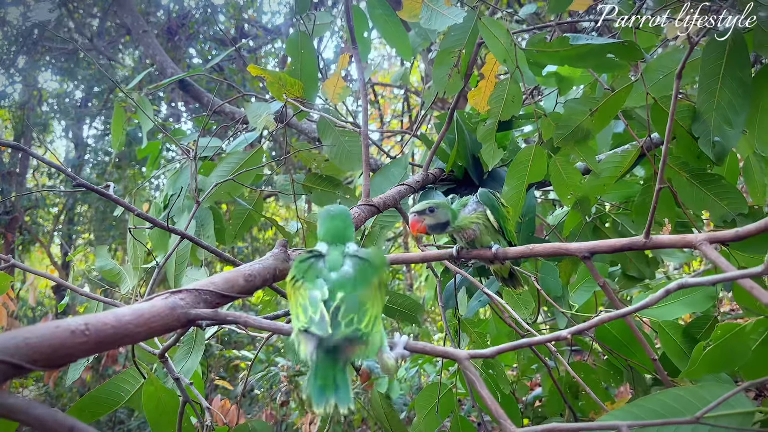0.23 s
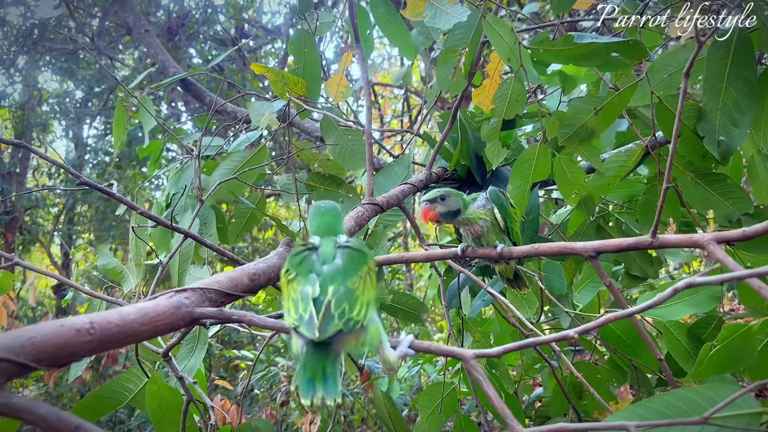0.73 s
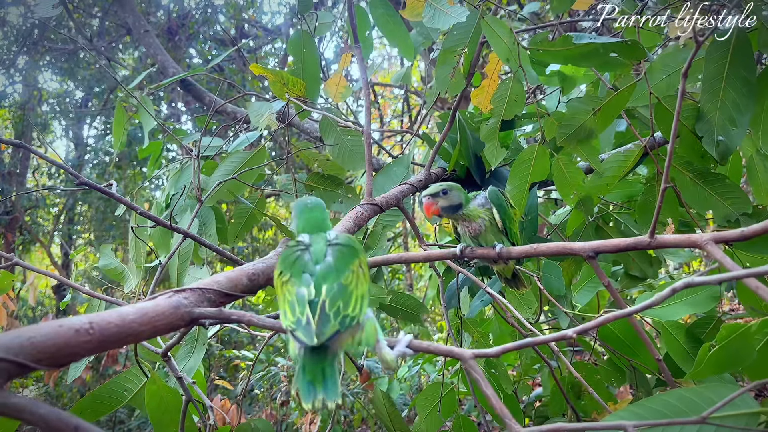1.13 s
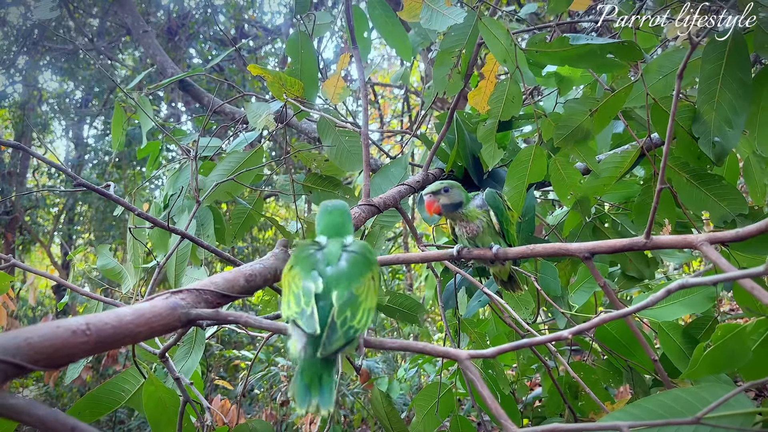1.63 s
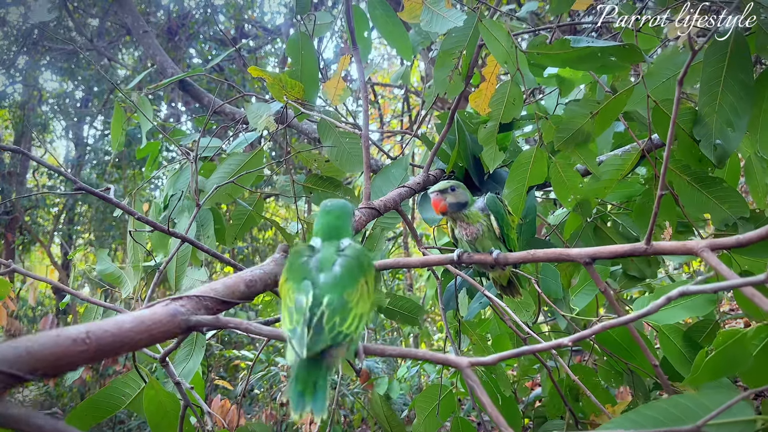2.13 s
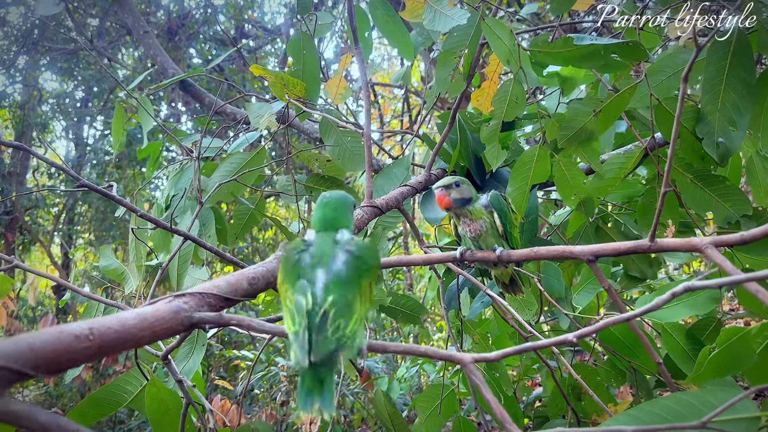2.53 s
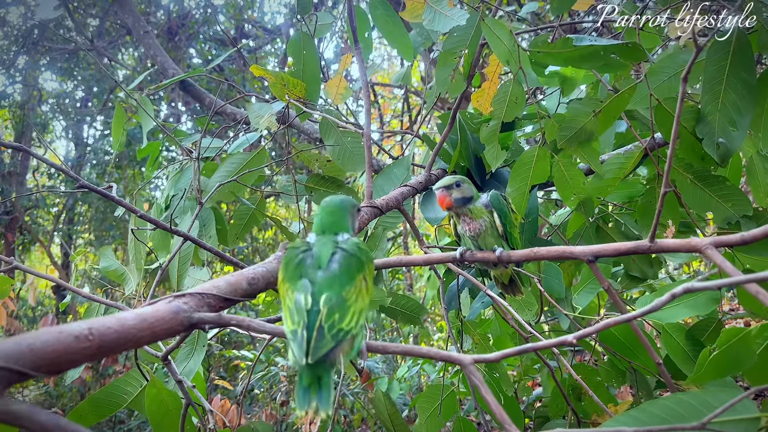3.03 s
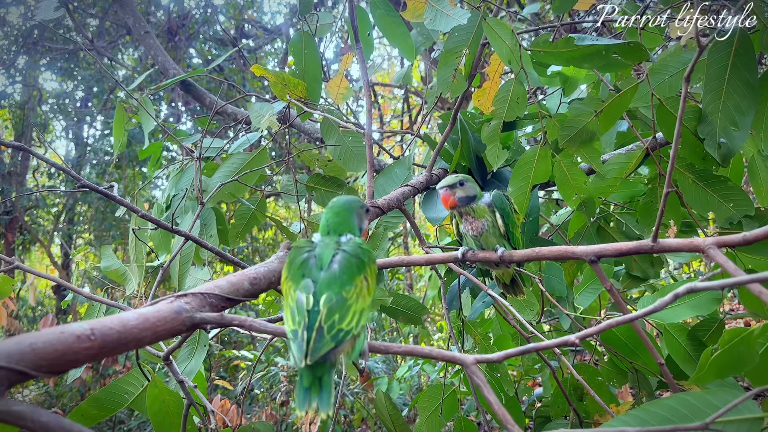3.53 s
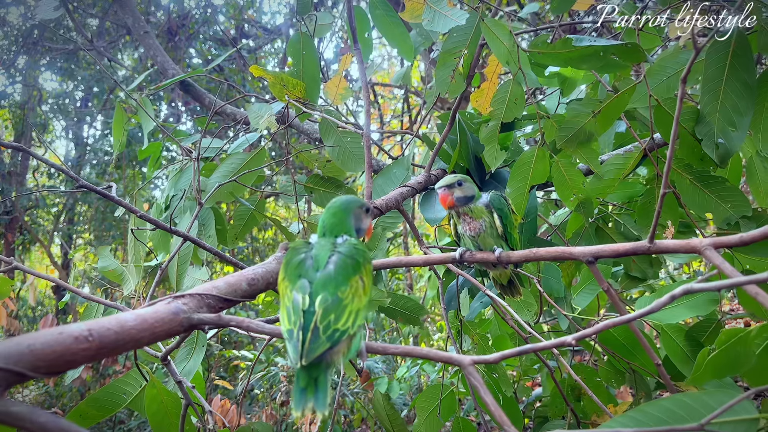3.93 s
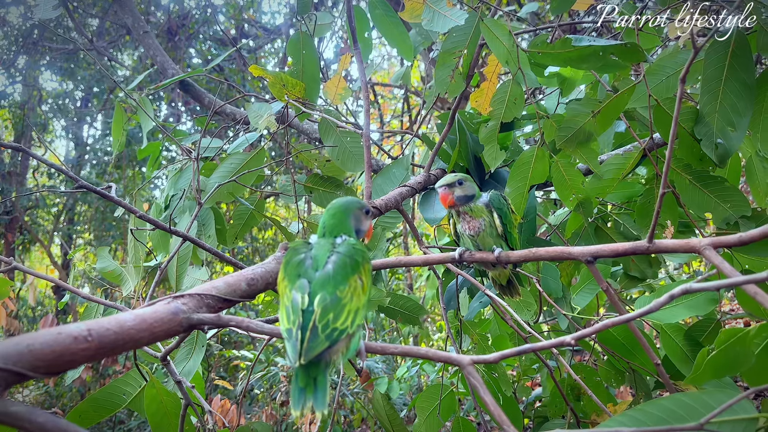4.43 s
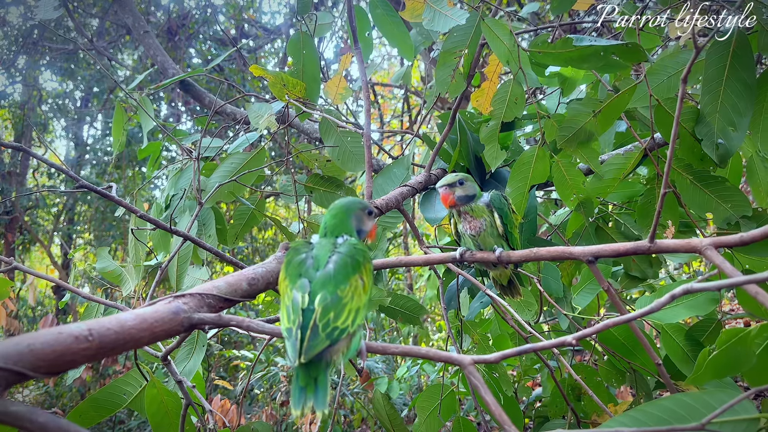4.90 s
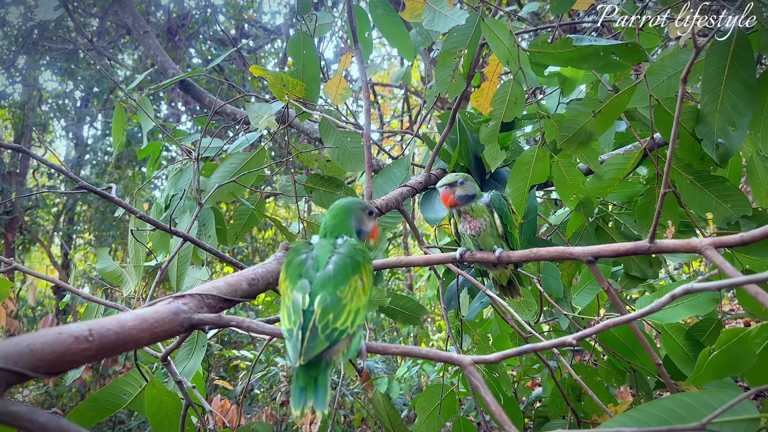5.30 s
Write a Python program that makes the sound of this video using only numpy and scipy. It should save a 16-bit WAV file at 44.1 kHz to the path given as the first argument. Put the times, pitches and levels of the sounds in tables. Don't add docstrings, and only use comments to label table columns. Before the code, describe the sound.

Dry leaves and twigs snap and rustle sharply as parakeets shift in a tree, with wing thumps, then a far bird whistle.

```python
import sys
import numpy as np
from scipy import signal
from scipy.fft import rfft, irfft
from scipy.io import wavfile

SR = 44100
rng = np.random.default_rng(int(sys.argv[2]) if len(sys.argv) > 2 else 0)


def decibels_to_gain(level_db):
    exponent = np.asarray(level_db, float) / 20
    return 10 ** exponent


def unload_audio(sound):
    columns = np.transpose(np.atleast_2d(sound))
    steps = np.round(np.clip(columns, -1, 1) * 32767)
    wavfile.write(sys.argv[1], SR, steps.astype(np.int16))


N = 245195

# [f/Hz, density/dB]
FOREST_SPECTRUM = [(88, -41), (150, -4.5), (627, -5.5), (703, -4.5), (1290, -1.5), (1720, 0.5), (1970, 0),
                   (2210, 1), (3050, 2.5), (4140, -0.5), (5110, 2.5), (6930, -8.5), (10900, -28),
                   (14300, -25)]
FOREST_DB = -60.5
# [middle t/s, length/s, level/dB]
FAR_LEAF_STIRS = [(0.037, 0.17, -85), (0.212, 0.062, -72), (.38, 0.5, -85), (.69, 0.091, -77),
                  (.87, .4, -80), (1.04, 0.13, -86), (1.2, 0.056, -73), (1.27, .15, -78),
                  (4.248, 0.13, -68), (4.362, 0.023, -65.5), (4.383, 0.033, -66), (4.567, 0.018, -77),
                  (4.864, 0.012, -78), (4.438, 0.33, -78), (4.5, 0.069, -85), (4.616, 0.38, -75),
                  (4.85, .3, -78), (5.02, 0.055, -75), (5.15, 0.45, -90), (5.387, 0.22, -69),
                  (5.496, 0.22, -80)]

STILL_AIR_DB, UPPER_AIR_DB = -72.5, -10.5
WAKE_S, WAKE_RISE_S, WAKE_DB, WAKE_FADE_DB_PER_S = 1.546, 0.16, -53, 9
# [middle t/s, length/s, level below 130 Hz/dB, relative level at 130-350 Hz/dB]
WING_PUFFS = [(1.478, 0.021, -60, 7.5), (1.749, 0.074, -54, 2), (1.826, 0.13, -57, 11),
              (1.905, 0.052, -50.5, -3.5), (2.214, 0.031, -53, -8), (2.44, 0.08, -57, -2),
              (2.526, 0.038, -56, 4), (2.596, 0.13, -55.5, -10), (2.83, 0.11, -57, -11),
              (2.968, 0.047, -68, -10), (3.159, 0.049, -61, 0), (3.283, 0.071, -68, -11),
              (3.528, 0.15, -56.5, -25), (3.859, 0.065, -70.5, 7.5)]

# [t/s, peak level at 3.5-8 kHz/dB, relative twig body level/dB, t60/s]
BRITTLE_BREAKS = [(1.75, -26.5, 7, 0.0072), (1.84, -29.5, 6.5, 0.018), (1.781, -29, 11, .008),
                  (2.0435, -43.5, -15, 0.032), (2.3778, -40.5, 10.5, 0.022), (2.465, -36.5, 7.5, 0.028),
                  (3.0268, -46.5, 5, 0.065), (3.147, -33.5, -2.5, 0.017), (3.422, -57, -17, 0.023),
                  (3.4834, -45.5, 2.5, 0.079), (3.5616, -49, 6.5, 0.082), (3.962, -43.5, -6, .008),
                  (4.0359, -35, -13, 0.0099), (4.061, -48, -8, 0.017), (4.0921, -47, -6, 0.042),
                  (4.48, -57, -8, .04)]
DRY_BREAKS = [(1.184, -50, -1, .041), (1.311, -56, 7, .07), (1.4671, -19.5, -5.5, 0.033),
              (1.79, -32, -5, 0.015), (1.802, -35, -1, 0.022), (1.813, -36, 8.5, 0.024),
              (1.819, -36, 3, 0.011), (1.832, -35, 0, .03), (1.858, -34, 0, 0.028), (2.061, -54, -16, .011),
              (2.343, -48, 9, .04), (2.752, -31.5, 2, 0.025), (2.7581, -31, 2.5, 0.015),
              (2.7657, -40.5, 10, 0.045), (2.981, -42.5, -0.5, 0.018), (3.071, -43.5, 0, 0.016),
              (3.112, -30, -6, 0.049), (3.1499, -31.5, -7, .028), (3.1701, -41.5, 0, 0.016),
              (3.2072, -32, -3, 0.012), (3.233, -45.5, -4, 0.08), (3.264, -42, -7, 0.044),
              (3.328, -37, -19, 0.019), (3.3356, -38, -0.5, 0.017), (3.532, -39, -7, 0.018),
              (3.6713, -39.5, -1, 0.073), (3.7155, -40.5, -0.5, 0.034), (3.8313, -51, -23, 0.011),
              (3.8429, -21.5, -5.5, 0.0071), (3.86, -39, -6, .03), (3.878, -43, -18, .03),
              (3.8955, -40.5, -25, .059), (3.9834, -33.5, -17, 0.016), (3.9862, -36.5, -2.5, 0.024),
              (4.074, -45, 7, 0.046), (4.153, -49, 0.5, 0.046), (4.242, -46, -3.5, 0.11),
              (4.526, -52.5, -2, 0.037), (4.9965, -56, -5, 0.055), (5.4137, -48.5, -2, 0.1),
              (5.5504, -29.5, -12, 0.065)]
GREEN_BREAKS = [(0.2127, -57, 5.5, 0.033), (.405, -48.5, -5, 0.053), (1.206, -54, -1, 0.028),
                (1.662, -21.5, -12, 0.012), (1.763, -36, 5, 0.021), (1.779, -24.5, -3, 0.012),
                (1.8083, -23, -6, 0.014), (1.982, -58, 0.5, .029), (2.01, -32, -24, 0.033),
                (2.366, -42.5, 10, 0.036), (2.813, -33, -5.5, 0.027), (2.9937, -32.5, -20, 0.013),
                (3.0534, -36.5, -6, 0.034), (3.191, -32, -29, 0.0055), (3.3231, -29, -19, 0.011),
                (3.3254, -36.5, -10, 0.038), (3.368, -39, 3, 0.062), (3.428, -54, -15, 0.015),
                (3.4423, -49.5, 13.5, 0.023), (3.462, -52, 11, .015), (3.5954, -38.5, -22, 0.011),
                (3.628, -38.5, -34, 0.024), (3.687, -31.5, -6, 0.027), (3.665, -50, -15, .01),
                (3.73, -44, -19, .03), (3.743, -39, -14, 0.02), (3.808, -48, -7, .015),
                (3.767, -44.5, -1, 0.033), (3.912, -27, -10.5, 0.012), (3.9556, -43, -12, .026),
                (4.009, -41.5, -4, 0.077), (4.05, -40, 0, 0.016), (4.054, -35, -9, 0.017),
                (4.087, -32, -18, 0.011)]
WOODY_BREAKS = [(1.639, -25.5, 3, 0.017), (1.6962, -42, 6, 0.026), (1.7438, -36, 2, 0.014),
                (1.7582, -34.5, 5, .02), (1.8486, -30, 3.5, 0.025), (1.9272, -40, -6, 0.084),
                (1.9545, -50, 12, 0.041), (2.112, -49, 14.5, 0.013), (2.121, -41.5, 3, 0.018),
                (2.131, -39, -2, 0.026), (2.137, -36.5, -10, 0.02), (2.2191, -37, -15, 0.027),
                (2.303, -47.5, -2, 0.083), (2.801, -45, 3, 0.049), (3.009, -48.5, 9, 0.01),
                (3.3809, -32, -22, .006), (3.499, -36.5, -13, 0.03), (3.542, -43.5, -9, 0.028),
                (3.7992, -40.5, -9, 0.065)]
# [relative leaf edge level/dB, relative wood knock level/dB]
SNAP_COLOURS = [
    (8, -5),
    (-2.5, -18.5),
    (-19, -17),
    (-7.5, -4.5),
]
KNOCK_FOLLOWS_BODY = 0.074
# [low f/Hz, high f/Hz]
SNAP_PARTS = [
    (3700, 8000),
    (800, 3000),
    (8000, 16500),
    (250, 800),
]
# [t/s, twig f/Hz, leaf f/Hz]
CLEAR_RINGS = [(1.4675, 1510, 4480), (1.639, 860, 4630), (1.662, 1700, 6420), (1.75, 1160, 4800),
               (1.758, 1030, 4910), (1.764, 2580, 6890), (1.779, 2780, 4720), (1.7815, 2990, 4480),
               (1.79, 2630, 6720), (1.802, 2480, 4440), (1.8087, 2370, 7130), (1.813, 2240, 6520),
               (1.84, 1310, 6550), (1.8486, 2110, 7190), (1.9545, 1210, 6550), (2.01, 2970, 6720),
               (2.112, 2610, 5450), (2.219, 1030, 4670), (2.343, 1720, 5210), (2.3665, 1890, 4520),
               (2.3775, 2370, 4410), (2.465, 2200, 6610), (2.752, 1960, 4590), (2.7583, 2170, 6350),
               (2.7665, 2150, 4440), (2.801, 2890, 5100), (2.812, 2500, 5170), (2.981, 1340, 6480),
               (2.9935, 2090, 4350), (3.0266, 1960, 6400), (3.0534, 1850, 4970), (3.112, 2330, 4800),
               (3.15, 1080, 6610), (3.191, 1870, 7470), (3.2068, 2780, 6610), (3.264, 2150, 6830),
               (3.3233, 1740, 4890), (3.3265, 2500, 4840), (3.3356, 3080, 6400), (3.368, 2020, 6120),
               (3.3809, 2730, 6610), (3.4438, 2020, 4460), (3.4635, 1770, 7130), (3.499, 1360, 5080),
               (3.532, 2540, 6310), (3.5614, 1850, 4720), (3.6716, 2860, 5710), (3.6873, 2260, 6070),
               (3.7161, 2170, 6700), (3.767, 2200, 6720), (3.8429, 2520, 7020), (3.896, 2710, 4720),
               (3.911, 1920, 6180), (3.9834, 2370, 7210), (3.9865, 2670, 5250), (4.0365, 2220, 7080),
               (4.054, 2820, 4800), (4.076, 1380, 6910), (4.087, 3080, 6980), (5.5504, 3040, 7150)]
# [low f/Hz, high f/Hz]
TWIG_RING_RANGE = (1400, 2600)
# [low f/Hz, high f/Hz]
LEAF_RING_RANGE = (4800, 7400)
RING_Q = 4.0
# [peak level/dB, gain factor]
RING_AMOUNT = [
    (-34, 3.2),
    (-22, 1.2),
]
# [delay/s, level/dB]
TRUNK_ECHOES = [
    (0.01, -41),
    (0.026, -31),
]
# [delay/s, level/dB]
DISTANT_ECHO = (0.079, -13)

# [start t/s, length/s, start f/Hz, middle f/Hz, end f/Hz]
THIN_SQUEAKS = [(.265, .04, 13600, 13800, 14200), (.295, .03, 13500, 13600, 13700),
                (.275, .125, 11700, 12850, 12200), (.36, .075, 13900, 13750, 13400),
                (.33, .1, 11800, 11100, 11050), (.41, .05, 11850, 11800, 11700),
                (.265, .035, 10100, 10250, 10500), (.475, .05, 12000, 12200, 12100),
                (.505, .045, 13800, 13400, 13000), (.56, .04, 13500, 13550, 13600),
                (.61, .06, 12800, 12700, 13200)]
# [start t/s, length/s, start f/Hz, middle f/Hz, end f/Hz]
SMALL_PEEPS = [
    (.25, .2, 1020, 1130, 1100),
    (4.76, .09, 1000, 1060, 1020),
    (4.53, .05, 5600, 5480, 5500),
]
SQUEAK_DB, PEEP_DB = -82, -80
# [t/s, f/Hz, level/dB]
RISING_CHIRP = [
    (4.83, 6800, -88),
    (4.87, 6950, -76),
    (4.92, 7120, -75),
    (4.98, 7200, -84),
]
CHIRP_OCTAVE_DB = -8
# [t/s, f/Hz, level/dB]
FAR_WHISTLE = [
    (4.955, 1150, -68),
    (5.03, 1079, -71),
    (5.16, 1116, -62),
    (5.238, 1182, -57),
    (5.31, 1330, -63),
    (5.345, 1372, -58),
    (5.376, 1348, -64),
    (5.452, 1105, -59),
    (5.47, 1045, -73),
    (5.55, 830, -70),
]
# [start t/s, length/s, f/Hz, width/Hz, level/dB]
INSECT_BUZZES = [
    (.40, 0.04, 6700, 1200, -68),
    (0.414, 0.1, 6460, 1280, -65.5),
    (.645, 0.21, 6440, 1200, -64),
    (4.49, 0.15, 6050, 1400, -61.5),
    (4.652, 0.027, 6900, 1490, -64),
]
# [t/s, f/Hz, t60/s, peak level/dB]
BRANCH_KNOCKS = [
    (0.591, 330, 0.046, -61.5),
    (1.197, 197, 0.19, -67.5),
    (2.577, 610, 0.017, -50.5),
    (2.909, 450, 0.019, -48),
    (4.267, 262, 0.037, -61.5),
    (4.995, 214, 0.14, -61.5),
]

# [t/s, level/dB]
LEAF_MOTION = [(1.15, -86), (1.3, -66), (1.46, -57.5), (1.62, -63), (1.65, -50), (1.74, -52), (1.87, -39),
               (1.92, -53.5), (2.07, -54.5), (2.2, -50), (2.27, -57.5), (2.85, -54), (3.29, -57),
               (3.5, -54), (3.65, -61.5), (4.15, -54.5), (4.19, -72), (4.35, -63.5)]
# [f/Hz, density/dB]
LEAF_SPECTRUM = [(88, -16), (150, -2.5), (398, -7), (599, -10.5), (1310, -7), (2800, -6), (3610, -10),
                 (4740, -2.5), (5760, -8.5), (6610, -0.5), (8680, -20.5), (9300, -16), (11400, -9.5),
                 (15900, -17.5)]
# [middle t/s, length/s, level/dB, relative dull level/dB]
LEAF_SWEEPS = [(1.495, 0.11, -56, -26), (1.656, 0.053, -54, 10.5), (1.728, 0.027, -45.5, 7.5),
               (1.758, 0.025, -43.5, 4), (1.78, 0.02, -49, 7), (1.793, 0.048, -45, 4.5),
               (1.845, 0.0089, -51, -9), (1.846, 0.035, -37, 3), (2.032, 0.039, -58, 5),
               (2.129, 0.051, -45.5, -1.5), (2.145, 0.052, -61, 4.5), (2.346, 0.017, -48.5, 9.5),
               (2.419, 0.018, -40, 6), (2.494, 0.069, -51, 2.5), (2.63, 0.018, -47, 5),
               (2.651, 0.014, -47, 8), (2.674, 0.017, -53, -8), (2.715, 0.014, -43.5, 1.5),
               (2.77, 0.016, -48.5, 15), (2.806, 0.061, -54, 4), (2.861, 0.019, -51.5, 14),
               (2.936, 0.022, -54.5, 8), (3.373, 0.02, -48, -9), (3.717, 0.12, -57.5, 2.5),
               (3.875, 0.11, -55.5, -20), (3.931, 0.02, -50.5, 3), (4.074, 0.075, -51.5, 2),
               (4.988, 0.035, -63, -7)]
GRAINS_PER_S, GRAIN_SPREAD_DB = 4000, 3.4
PATCHY_DB, DULL_SHARE_DB = 4.0, 2.5
# [t/s, f/Hz, peak level/dB]
WING_THUMPS = [
    (1.736, 75, -43),
    (1.797, 190, -43),
    (1.845, 143, -25.5),
    (1.903, 101, -37),
    (2.224, 202, -43),
    (2.418, 168, -37),
    (2.523, 110, -39),
    (2.598, 85, -42.5),
    (2.82, 75, -45),
    (3.153, 110, -43.5),
]
THUMP_CYCLES = 3.0
LOW_CUT_HZ, EDGE_HZ = 45, 16150


def rms_one(x):
    return x / np.sqrt(np.mean(x ** 2) + 1e-20)


def in_time(rows):
    s, *columns = np.transpose(rows)
    return [np.interp(np.arange(N) / SR, s, c) for c in columns]


def low_pass(x, hz, order=2):
    return signal.sosfilt(signal.butter(order, hz, fs=SR, output="sos"), x)


def band(x, lo_hz, hi_hz, order=2):
    return signal.sosfilt(signal.butter(order, [lo_hz, hi_hz], "band", fs=SR, output="sos"), x)


def colour(x, spectrum, size=4096):
    hz, level_db = np.transpose(spectrum)
    bins_hz = np.fft.rfftfreq(size, 1 / SR)
    log_gain = np.log(decibels_to_gain(np.interp(np.log(bins_hz + 1), np.log(hz), level_db)))
    cepstrum = irfft(log_gain)
    cepstrum[1:size // 2] *= 2
    cepstrum[size // 2 + 1:] = 0
    impulse = irfft(np.exp(rfft(cepstrum)))
    return rms_one(signal.fftconvolve(x, impulse)[:N])


def drift(rate):
    r = np.exp(-2 * np.pi * rate / SR)
    noise = rng.standard_normal(N + SR)
    return rms_one(signal.lfilter([1], [1, -2 * r, r * r], noise)[SR:])


def tone(hz, level_db):
    return np.sqrt(2) * decibels_to_gain(level_db) * np.sin(2 * np.pi * np.cumsum(hz) / SR)


def window(rows, fade_s=0.0074):
    t0, t1 = rows[0][0], rows[-1][0]
    return np.interp(np.arange(N) / SR, [t0, t0 + fade_s, t1 - fade_s, t1], [0, 1, 1, 0])


def swell(s, length):
    return np.clip(1 - ((np.arange(N) / SR - s) / (0.58 * length)) ** 2, 0, 1) ** 2


def forest():
    hiss = colour(rng.standard_normal(N), FOREST_SPECTRUM + [(15200, -75.0)])
    hiss = decibels_to_gain(FOREST_DB + 0.52 * drift(29)) * hiss
    flicker = rms_one(band(rng.standard_normal(N) * decibels_to_gain(3.5 * drift(60)), 6000, 14300, order=4))
    stir_gain = sum(decibels_to_gain(db) * swell(s, length) for s, length, db in FAR_LEAF_STIRS)
    return hiss + stir_gain * flicker


def gusts():
    since = np.arange(N) / SR - WAKE_S
    wake = decibels_to_gain(WAKE_DB - WAKE_FADE_DB_PER_S * since) * np.clip(since / WAKE_RISE_S, 0, 1)
    bed = decibels_to_gain(STILL_AIR_DB) + wake
    low_gain, upper_gain = bed, bed * decibels_to_gain(UPPER_AIR_DB)
    for s, length, db, upper_db in WING_PUFFS:
        puff = decibels_to_gain(db) * swell(s, length)
        low_gain = low_gain + puff
        upper_gain = upper_gain + puff * decibels_to_gain(upper_db)
    low = rms_one(band(band(rng.standard_normal(N), 28.0, 95.0), 45.7, 143))
    upper = rms_one(band(rng.standard_normal(N) * decibels_to_gain(4.0 * drift(25)), 105, 230))
    return low_gain * low + upper_gain * upper


def snap_rows():
    rows = []
    kinds = (BRITTLE_BREAKS, DRY_BREAKS, GREEN_BREAKS, WOODY_BREAKS)
    for breaks, (edge_db, knock_db) in zip(kinds, SNAP_COLOURS):
        for s, db, body_db, t60 in breaks:
            rows.append((s, db, body_db, edge_db, knock_db + KNOCK_FOLLOWS_BODY * body_db, t60))
    return np.array(rows)


def ring(bursts, times, peak_db):
    chance = rng.random((len(times), 2))
    twig_hz = np.interp(chance[:, 0], [0, 1], TWIG_RING_RANGE)
    leaf_hz = np.interp(chance[:, 1], [0, 1], LEAF_RING_RANGE)
    pitches = np.c_[twig_hz, leaf_hz]
    for s, *hz in CLEAR_RINGS:
        pitches[np.abs(times - s).argmin()] = hz
    gains = np.interp(peak_db, *np.transpose(RING_AMOUNT))
    rung = []
    for x, pair, gain in zip(bursts, pitches, gains):
        resonances = sum(signal.lfilter(*signal.iirpeak(hz, RING_Q, fs=SR), x) for hz in pair)
        rung.append(x + gain * resonances)
    return np.array(rung)


def snaps(size=3000):
    rows, t, out = snap_rows(), np.arange(size) / SR, np.zeros(N + size)
    times, peak_db = rows[:, 0], rows[:, 1]
    t60 = np.clip(rows[:, 5:], .004, .07)
    draws = rng.standard_normal((len(rows), 2, size))
    crackle = draws[:, 0] * decibels_to_gain(3.5 * draws[:, 1])
    crack = 1.5 * draws[:, 1] * decibels_to_gain(-60 * np.abs(t - .0004) / .003)
    crack[:, round(.0004 * SR)] = .075 / t60[:, 0] * np.sign(draws[:, 0, 0])
    burst = crackle * decibels_to_gain(-60 * t / t60) * np.minimum(t / 0.000098, 1) + crack
    leaf_impulse = colour(np.r_[1., np.zeros(size)], np.multiply(LEAF_SPECTRUM, [1, .5]))
    burst = signal.fftconvolve(burst, leaf_impulse[None, :size], axes=1)[:, :size]
    burst = ring(burst, times, peak_db)
    levels_db = rows[:, 1:2] + np.c_[0 * peak_db, rows[:, 2:5]]
    shaped = 0
    for k, (lo_hz, hi_hz) in enumerate(SNAP_PARTS):
        part = band(burst, lo_hz, hi_hz) * (1, -1, -1, 1)[k]
        part = part / np.abs(part).max(axis=1, keepdims=True)
        shaped = shaped + part * decibels_to_gain(levels_db[:, k:k + 1])
    for s, one in zip(times, shaped):
        i = round(s * SR)
        out[i:i + size] += one
    return out[:N]


def trunks(x, echoes):
    dull = low_pass(x, 4000, order=1)
    return x + sum(decibels_to_gain(db) * np.r_[np.zeros(round(s * SR)), dull][:N] for s, db in echoes)


def birds():
    hz, level_db = in_time(FAR_WHISTLE)
    out = tone(hz, level_db + .8 * drift(20)) * window(FAR_WHISTLE)
    hz, level_db = in_time(RISING_CHIRP)
    level_db = level_db + 4.0 * drift(50)
    chirp = tone(hz, level_db) + tone(2 * hz, level_db + CHIRP_OCTAVE_DB)
    out += chirp * window(RISING_CHIRP)
    waver_db = 4.0 * drift(40)
    calls = [(*r, SQUEAK_DB) for r in THIN_SQUEAKS] + [(*r, PEEP_DB) for r in SMALL_PEEPS]
    for t0, length, *bend_hz, level_db in calls:
        i, count = round(t0 * SR), round(length * SR)
        u = np.linspace(0, 1, count)
        hz = np.polyval(np.polyfit([0, .5, 1], bend_hz, 2), u)
        shape = np.sqrt(np.sin(np.pi * u).clip(0))
        out[i:i + count] += tone(hz, level_db + waver_db[i:i + count]) * shape
    return out


def insects():
    t, out = np.arange(N) / SR, 0
    rasp = rng.standard_normal(N) * decibels_to_gain(1.2 * drift(83))
    for s, length, hz, width_hz, level_db in INSECT_BUZZES:
        shape = (t > s) * np.clip(1 - ((t - s) / length) ** 2, 0, 1)
        wings = rms_one(band(rasp, hz - width_hz / 2, hz + width_hz / 2))
        out = out + decibels_to_gain(level_db) * shape * wings
    return out


def knocks():
    t, out, noise = np.arange(N) / SR, 0, rng.standard_normal(N)
    for s, hz, t60, peak_db in BRANCH_KNOCKS:
        decay = (t > s) * decibels_to_gain(-60 * (t - s).clip(0) / t60)
        out = out + band(noise * decay + 1e-18, .5 * hz, 2 * hz) * decibels_to_gain(peak_db + 20.5)
    return out


def rustle():
    level_db, = in_time(LEAF_MOTION)
    sizes = decibels_to_gain(GRAIN_SPREAD_DB * np.minimum(rng.exponential(1, N), 3)) * rng.choice([-1, 1], N)
    clump_db = 1.5 * drift(60)
    patches = [drift(30.6) for _ in range(5)]
    born = rng.random(N) < GRAINS_PER_S * decibels_to_gain(clump_db + 3.0 * drift(15)) / SR
    edges, dealt = np.geomspace(200, 16500, 15), rng.integers(0, 14, N)
    rings = 0
    for k, (lo, hi) in enumerate(zip(edges, edges[1:])):
        grains = rms_one(band(sizes * born * (dealt == k) + 1e-18, lo, hi))
        rings = rings + grains * np.sqrt(hi - lo) * decibels_to_gain(PATCHY_DB * patches[k // 3])
    friction = .65 * decibels_to_gain(.5 * clump_db) * rng.standard_normal(N)
    leaves = colour(rms_one(rings) + friction, LEAF_SPECTRUM)
    dull = low_pass(leaves, 3000)
    bright_gain = decibels_to_gain(level_db) * window(LEAF_MOTION)
    dull_gain = bright_gain * decibels_to_gain(DULL_SHARE_DB)
    for s, length, sweep_db, share_db in LEAF_SWEEPS:
        sweep = decibels_to_gain(sweep_db) * swell(s, length)
        bright_gain = bright_gain + sweep
        dull_gain = dull_gain + sweep * decibels_to_gain(share_db)
    return bright_gain * (leaves - dull) + dull_gain * dull


def thumps():
    t, out = np.arange(N) / SR, 0
    for s, hz, peak_db in WING_THUMPS:
        turns = hz * (t - s).clip(0)
        out = out - decibels_to_gain(peak_db + 6.0 - 60 * turns / THUMP_CYCLES) * np.sin(2 * np.pi * turns)
    return low_pass(out, 420)


def scene():
    near = trunks(snaps(), TRUNK_ECHOES)
    far = trunks(birds(), TRUNK_ECHOES + [DISTANT_ECHO])
    air = forest() + gusts() + thumps()
    return (air + near + far + insects() + knocks() + rustle())[None]


def band_limit(x):
    return signal.sosfilt(signal.butter(12, 16800, fs=SR, output="sos"), x)


def record(dry):
    top_cut = signal.sosfilt(signal.ellip(8, .5, 40, EDGE_HZ - 250, fs=SR, output="sos"), dry)
    mix = signal.sosfilt(signal.butter(4, LOW_CUT_HZ, "high", fs=SR, output="sos"), top_cut)
    return band_limit(mix)


dry = scene()
out = record(dry)
unload_audio(out)
```